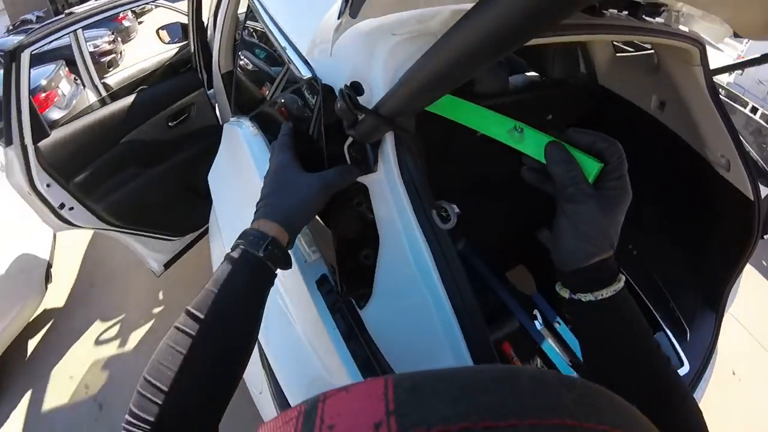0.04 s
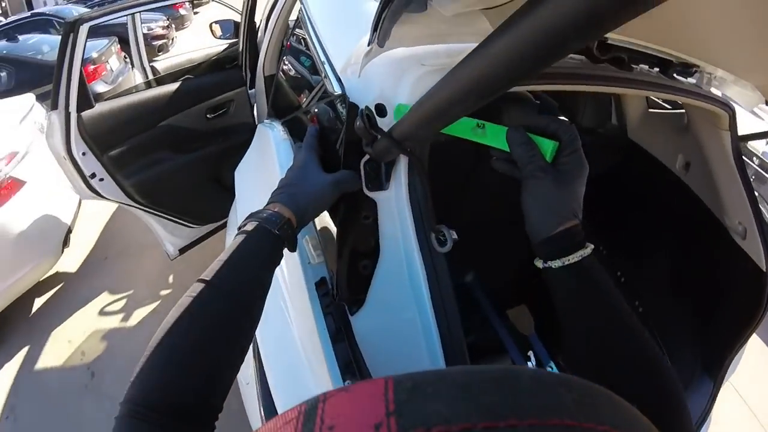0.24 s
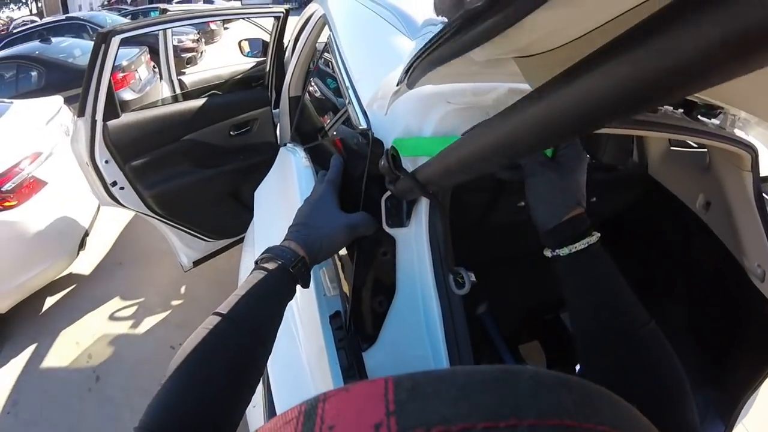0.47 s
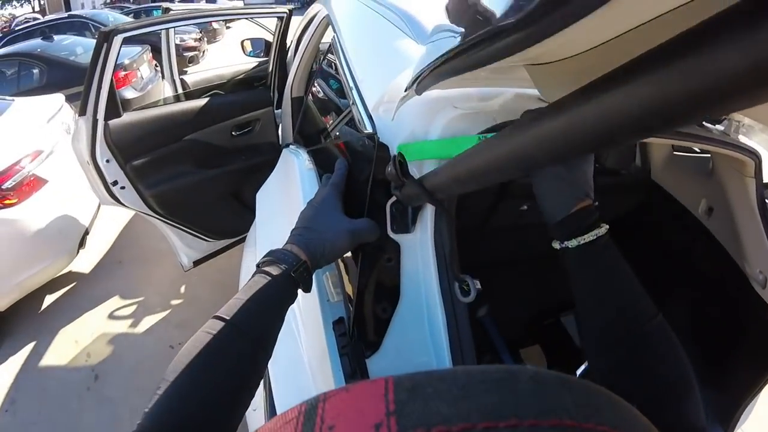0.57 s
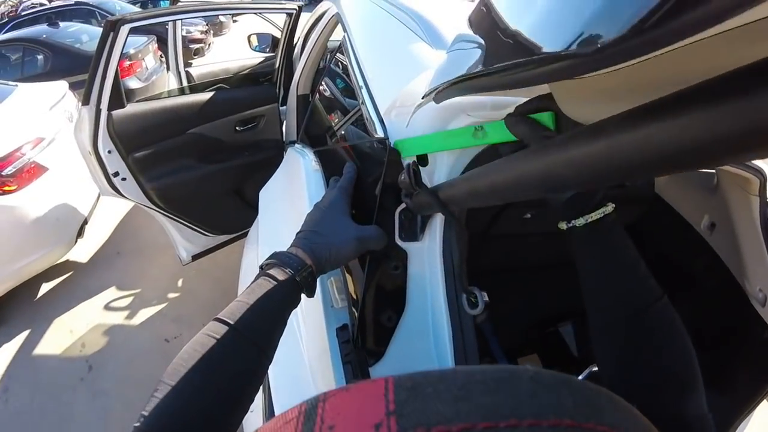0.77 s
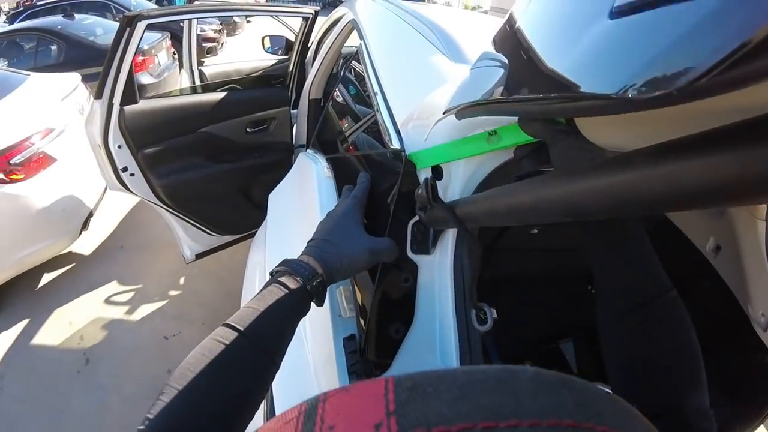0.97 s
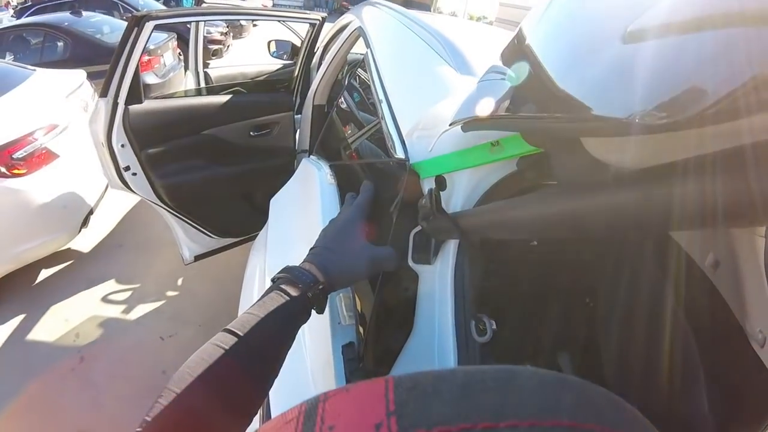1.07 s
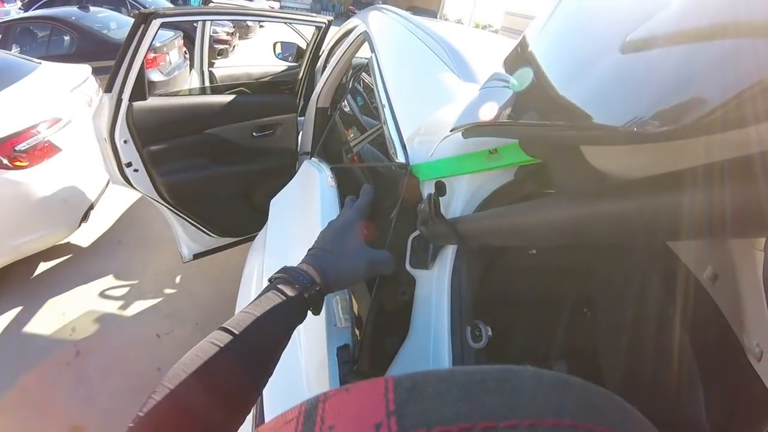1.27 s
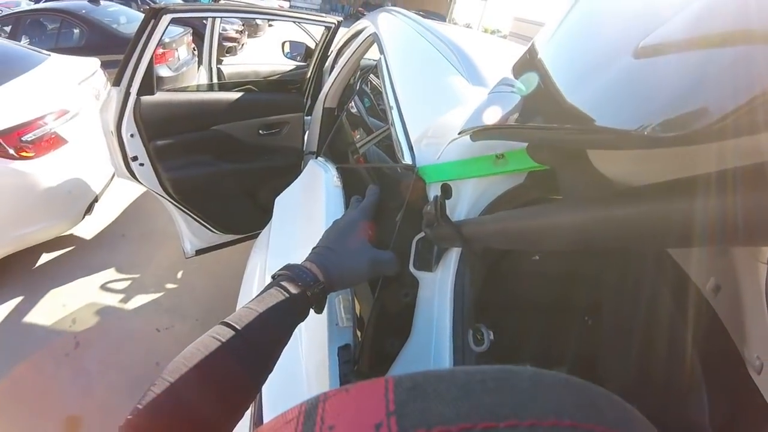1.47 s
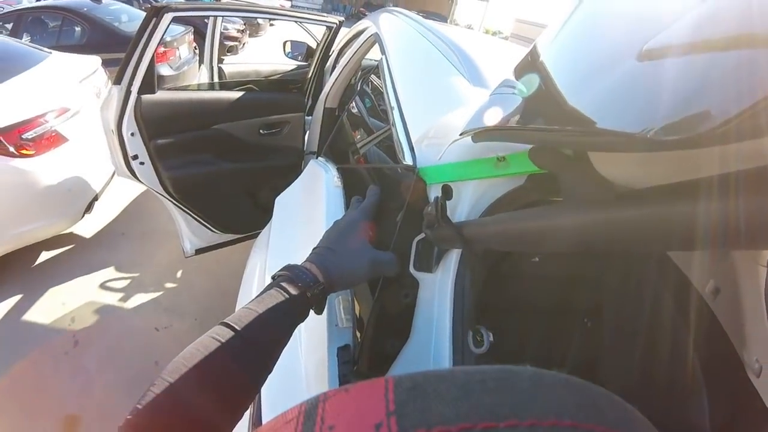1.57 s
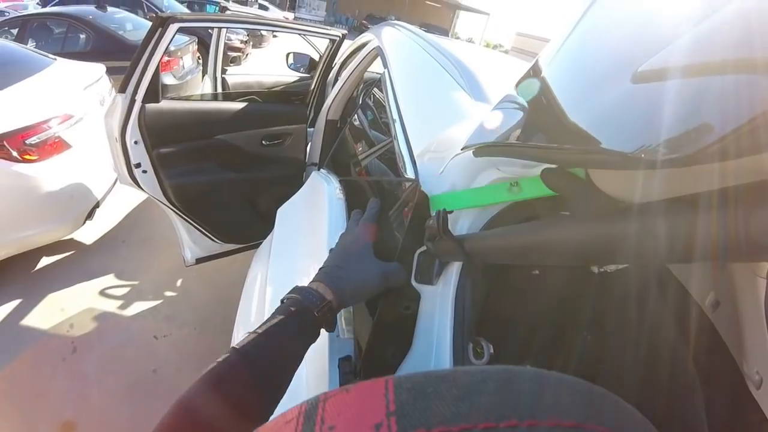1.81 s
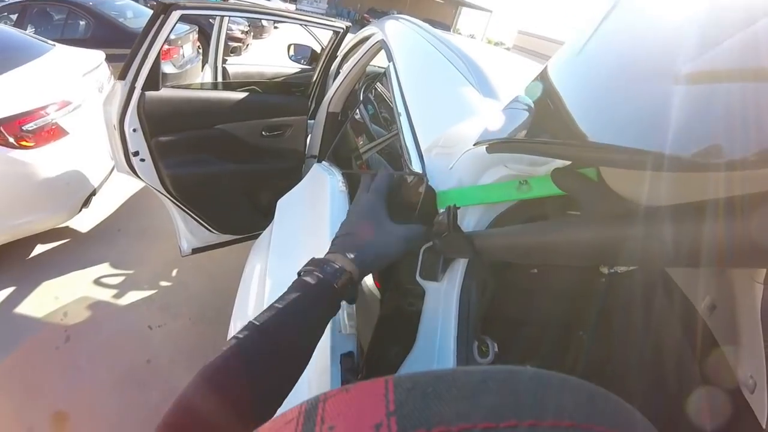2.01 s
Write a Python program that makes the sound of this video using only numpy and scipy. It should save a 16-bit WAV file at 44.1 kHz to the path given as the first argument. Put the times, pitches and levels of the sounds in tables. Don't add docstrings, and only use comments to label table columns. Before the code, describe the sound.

Plastic trim strip creaks and pops free with a sharp snap, wind rumbling on the microphone

```python
import sys
import numpy as np
from scipy import signal
from scipy.fft import rfft, irfft
from scipy.io import wavfile
from scipy.ndimage import uniform_filter1d

SR = 44100
rng = np.random.default_rng(int(sys.argv[2]) if len(sys.argv) > 2 else 0)


def generate_wav(sig):
    pcm = np.round(np.clip(np.atleast_2d(sig).T, -1, 1) * 32767).astype(np.int16)
    wavfile.write(sys.argv[1], SR, pcm)


def level_to_linear(level):
    exponent = np.asarray(level, float) / 20
    return 10 ** exponent


N = 90404


def in_time(rows):
    s, *columns = np.transpose(rows)
    return [np.interp(np.arange(N) / SR, s, column) for column in columns]


def rms_one(x):
    return x / np.sqrt(np.mean(x ** 2) + 1e-20)


def evened(x, span_s=0.045):
    span = int(span_s * SR)
    power = uniform_filter1d(uniform_filter1d(x ** 2, span), span)
    return x / np.sqrt(power)


def drift(rate_hz):
    hop = 40
    r = np.exp(-2 * np.pi * rate_hz * hop / SR)
    steps = rng.standard_normal(N // hop + 2002)
    slow = signal.lfilter([1], [1, -2 * r, r * r], steps)[2000:]
    return np.interp(np.arange(N) / hop, np.arange(len(slow)), rms_one(slow))


def coloured(spectrum, shared_db, patchy_db, rate_hz, steady=False):
    hz, db = np.transpose(spectrum)
    f = np.arange(N // 2 + 1) * SR / N + 1e-3
    colour_db = np.interp(np.log(f), np.log(hz), db, left=-200, right=-200)
    shaped = rfft(rng.standard_normal(N)) * level_to_linear(colour_db)
    out, together = 0, drift(rate_hz / 2)
    for centre in np.arange(np.log2(hz[0]), np.log2(hz[-1]) + 0.5, 0.5):
        window = np.cos(np.pi * np.clip(np.log2(f) - centre, -0.5, 0.5)) ** 2
        part = irfft(shaped * window, N)
        if steady:
            part = evened(part, 0.02) * part.std()
        out = out + part * level_to_linear(shared_db * together + patchy_db * drift(rate_hz))
    return rms_one(out)


# pitch_hz, level_db (per Hz)
TRAFFIC_COLOUR = [(150, 4.5), (400, -5), (850, -3.5), (1250, -2), (1550, -9), (2100, -22), (3400, -19),
                  (4200, -27)]
# time_s, level_db
TRAFFIC_LEVEL = [(0.0, -44), (0.52, -47), (0.59, -46), (1.42, -45), (2.05, -43.5)]


def traffic():
    level_db, = in_time(TRAFFIC_LEVEL)
    return level_to_linear(level_db + 1) * coloured(TRAFFIC_COLOUR, shared_db=-0.22, patchy_db=2.02, rate_hz=22, steady=True)


# pitch_hz, level_db (per Hz)
HISS_COLOUR = [(3500, -14), (4400, 1), (5200, -3.5), (7700, -6.5), (9500, -13), (11500, -17),
               (12800, -23.5), (14500, -52)]
# time_s, level_db
HISS_LEVEL = [(0.0, -68.5), (.12, -73.5), (.155, -70.5), (.19, -74.5), (0.53, -75), (1.45, -74.5),
              (1.62, -73.5), (1.94, -74), (1.968, -66.5), (1.99, -75), (2.05, -73)]


def air_hiss():
    breeze_db, = in_time(HISS_LEVEL)
    usual_db = breeze_db.mean()
    level_db = 9 + usual_db + 0.77 * (breeze_db - usual_db)
    return level_to_linear(level_db) * coloured(HISS_COLOUR, shared_db=0.7, patchy_db=0.86, rate_hz=11.3)


def hum():
    t = np.arange(N) / SR
    level_db = -55 + 1.5 * drift(2.4)
    return level_to_linear(level_db) * np.sin(2 * np.pi * 359.5 * t + 0.8 * drift(5))


# time_s, level_db
WHINE_LEVEL = [(0, -71.5), (.55, -69), (.8, -64.5), (1.1, -62.5), (1.5, -62.5), (1.85, -57.5),
               (2.05, -59.5)]


def whine():
    t = np.arange(N) / SR
    pair = np.sin(2 * np.pi * 2127 * t) + level_to_linear(-11) * np.sin(2 * np.pi * 2082 * t)
    level_db = in_time(WHINE_LEVEL)[0] + drift(6.5)
    return np.sqrt(2) * level_to_linear(level_db) * pair


# pitch_hz, level_db (per Hz)
WIND_COLOUR = [(8.8, 5), (15, 2.5), (37, 4), (110, -15), (140, -78), (240, -120)]
# pitch_hz, level_db (per Hz)
FLUTTER_COLOUR = [(70, -18), (110, 2.5), (190, -9.5), (350, -18.5), (520, -37.5)]
# time_s, level_db, flutter_db
GUST = [(0, -17.5, -39), (.1, -42, -3), (.17, -23.5, -23.5), (.4, -29, -13), (.58, -26, -9),
        (.65, -21.5, -8), (.7, -21.5, -14), (.79, -24, -18), (.85, -18.5, -19), (.89, -29.5, -8),
        (.93, -17.5, -13.5), (.97, -35, -6.5), (1.08, -28.5, -13.5), (1.2, -26, -22), (1.38, -25.5, -13.5),
        (1.45, -33, -4), (1.55, -30.5, -21.5), (1.8, -30.5, -17), (2.05, -30.5, -11.5)]
# centre_s, peak_db, length_s, direction (+1 push, -1 suck)
BUFFETS = [(0.187, -15.5, 0.0034, 1), (0.641, -16, 0.004, -1), (0.69, -11.5, 0.0088, -1),
           (0.83, -22.5, 0.0037, -1), (0.848, -21, 0.0024, -1), (0.878, -12, 0.0029, 1),
           (0.8893, -6, 0.0053, 1), (1.005, -15, 0.0078, -1), (1.151, -14.5, 0.0053, -1),
           (1.221, -24, 0.0046, -1), (1.285, -18.5, 0.0045, -1), (1.382, -24, 0.0046, 1),
           (1.646, -17, 0.0044, -1), (1.738, -21, 0.005, 1)]


def wind():
    level_db, flutter_db = in_time(GUST)
    rumble = evened(coloured(WIND_COLOUR, shared_db=10, patchy_db=1, rate_hz=2.2))
    flutter = evened(coloured(FLUTTER_COLOUR, shared_db=-8, patchy_db=2, rate_hz=11))
    out = level_to_linear(level_db) * (rumble + level_to_linear(flutter_db) * flutter)
    t = np.arange(N) / SR
    rebound, wider = 0.89, 2.27
    for centre_s, peak_db, length_s, direction in BUFFETS:
        u = (t - centre_s) / length_s
        push = (1 + rebound) * np.exp(-u ** 2 / 2)
        swing_back = rebound * np.exp(-((u - 1) / wider) ** 2 / 2)
        out += np.sign(direction) * level_to_linear(peak_db) * (push - swing_back)
    return out * np.clip(np.minimum(t, t[::-1]) / 0.02, 0.1, 1)


def band(x, hz, width_hz):
    edges = [hz - width_hz / 2, hz + width_hz / 2]
    return rms_one(signal.sosfilt(signal.butter(2, edges, "band", fs=SR, output="sos"), x))


# time_s, level_db, brightness_db
SLIDE = [
    (.29, -59, -20),
    (.322, -49, -25),
    (.344, -46.5, -21),
    (.358, -44.5, -2.5),
    (.41, -43, 2),
    (.45, -40.5, 0.5),
    (.49, -46, -2.5),
    (.525, -51, -5.5),
    (.56, -90, 3),
]
# pitch_hz, width_hz, level_db, change_db_per_s
RUB = [(633, 250, -3, 15), (987, 210, 0.5, 47), (1183, 110, 6.5, -23), (1450, 130, 0, 38),
       (2070, 910, -9.5, 84), (2710, 440, -6, 3), (3090, 600, -15, 34), (3534, 125, -9.5, -120),
       (3920, 690, -30, -20), (6030, 420, -24, -38), (8300, 570, -35, 0)]


def slide():
    level_db, bright_db = in_time(SLIDE)
    t = np.arange(N) / SR
    on = (t > SLIDE[0][0]) & (t < SLIDE[-1][0])
    slips = rng.random(N) < 6000 / SR
    strength = level_to_linear(2.5 * np.minimum(rng.exponential(1, N), 4))
    grains = slips * strength * rng.choice([-1, 1], N)
    out = 0
    for hz, width_hz, rub_db, db_per_s in RUB:
        now_db = rub_db + db_per_s * on * (t - 0.43) + bright_db * (hz > 1700)
        out = out + level_to_linear(now_db) * np.sqrt(width_hz / 300) * band(grains, hz, width_hz)
    centre = np.interp(t, [SLIDE[3][0], SLIDE[-2][0]], np.log2([3000, 2100]))
    for k, hz in enumerate(np.geomspace(1700, 4800, 9)):
        near = np.exp(-0.5 * ((np.log2(hz) - centre) / 0.43) ** 2)
        own_grains = np.roll(band(grains, hz, hz / 8), 997 * (k + 1))
        out = out + level_to_linear(-12 + bright_db) * near * own_grains
    return on * level_to_linear(level_db) * signal.lfilter(*signal.butter(4, 11500, fs=SR), out)


def ring(x, hz, t60_s):
    r, w = level_to_linear(-60 / (t60_s * SR)), 2 * np.pi * hz / SR
    return signal.lfilter([0, np.sin(w)], [1, -2 * r * np.cos(w), r * r], x)


def crack(puff, level_db, breaking):
    t = np.arange(len(puff)) / SR
    fade = level_to_linear(-3 + level_db - 60 * t / 0.011)
    rise = 1 - np.exp(-t / 0.0007)
    colour = np.r_[signal.butter(1, [1400, 7900], "band", fs=SR, output="sos"),
                   signal.butter(4, 12300, fs=SR, output="sos")]
    out = signal.sosfilt(colour, fade * rise * puff)
    out = out + 1.1 * signal.lfilter(*signal.iirpeak(3020, 2.5, fs=SR), out)
    if breaking:
        return out
    return signal.lfilter(*signal.butter(3, 4500, fs=SR), out)


# pitch_hz, level_db, t60_s
TRIM = [(300, 0.5, 0.044), (533, 0, 0.052), (860, 9, 0.021), (1010, 11, 0.056), (1089, 16.5, 0.028),
        (1260, 14.5, .024), (1460, -5, 0.06), (1860, 1, 0.02), (2760, -1, 0.017), (3060, -1, 0.011),
        (3420, -9, 0.021), (5170, -2, 0.011), (6800, -8, 0.016), (8400, -5, 0.014)]
# start_s, peak_db, favoured_pitch_hz, spread_octaves, crack_db
SNAP = [(.9657, -33, 4500, 1.2, 9), (.9663, -21, 1260, 0.7, -15), (.9682, -24.5, 3260, 0.65, -8),
        (.9689, -25, 1210, 0.15, -33), (.9705, -23.5, 1360, 0.077, -15), (.9721, -25.5, 1188, 0.059, -30),
        (.9737, -28, 1146, 0.14, -32), (.978, -27, 1100, 0.37, -17), (.982, -32, 750, 0.65, -5),
        (.984, -26.5, 320, 0.17, -7), (.987, -36.5, 1210, 0.3, -22), (.992, -22, 300, 0.61, -15),
        (.997, -38, 704, 0.54, -20)]
# start_s, peak_db, favoured_pitch_hz, spread_octaves, crack_db
TICKS = [(.19, -48, 3320, 0.27, -9.5), (0.6234, -37, 1450, 0.27, -23), (0.635, -36, 2580, 0.95, -23),
         (0.859, -36, 1010, 0.1, -21), (0.865, -33, 1010, 0.092, -24), (0.873, -34.5, 970, 0.14, -24),
         (0.879, -26, 333, 0.72, -24), (0.894, -22.5, 300, 0.24, -25), (0.929, -37, 1100, 0.27, -24),
         (.938, -35, 1000, 0.1, -24), (1.4002, -32.5, 1180, 0.37, -2), (1.402, -39, 1240, 0.24, -17),
         (1.426, -34, 300, .3, -25), (1.441, -31, 330, 0.67, -22), (1.46, -26.5, 290, 0.48, -25),
         (1.471, -33.5, 300, 0.38, -25), (1.458, -34.5, 1120, 0.22, 2.5), (1.637, -33, 1100, 0.97, -2),
         (1.732, -32.5, 1300, 0.79, -6), (1.858, -41.5, 3530, 0.12, 4), (1.967, -47, 3420, .05, -15),
         (1.972, -42, 3420, .05, -18), (1.949, -33, 1260, 0.065, -25), (1.961, -33.5, 1260, 0.068, -17),
         (2.038, -33.5, 1190, .15, -25)]


def contacts():
    span = int(0.12 * SR)
    click = np.r_[1.0, np.zeros(span - 1)]
    modes = []
    for hz, _, t60_s in TRIM:
        soften = signal.butter(3, min(2 * hz, 15000), fs=SR)
        modes.append(signal.lfilter(*soften, ring(click, hz, t60_s)))
    modes = np.array(modes)
    mode_hz, mode_db, _ = np.transpose(TRIM)
    snap_s = SNAP[0][0]
    out = np.zeros(N + span)
    for start_s, peak_db, hz, octaves, crack_db in SNAP + TICKS:
        luck_db = 1.5 * rng.standard_normal(len(TRIM))
        distance = np.log2(mode_hz / hz) / max(octaves, 0.05)
        near = np.exp(-0.5 * distance ** 2) * level_to_linear(mode_db + luck_db)
        ringing = near @ modes / np.linalg.norm(near)
        breaking = snap_s <= start_s < snap_s + 0.004
        noise = crack(rng.standard_normal(span), crack_db, breaking)
        first = int(start_s * SR)
        out[first:first + span] += level_to_linear(peak_db) * (ringing + noise)
    return out[:N]


def scene():
    background = traffic() + air_hiss() + hum() + whine()
    return (background + wind() + slide() + contacts())[None]


def low_pass(x):
    return signal.sosfilt(signal.butter(12, 15710, fs=SR, output="sos"), x)


def record(dry):
    dull = signal.sosfilt(signal.butter(4, 14200, fs=SR, output="sos"), dry)
    return low_pass(dull)


dry = scene()
out = record(dry)
generate_wav(out)
```